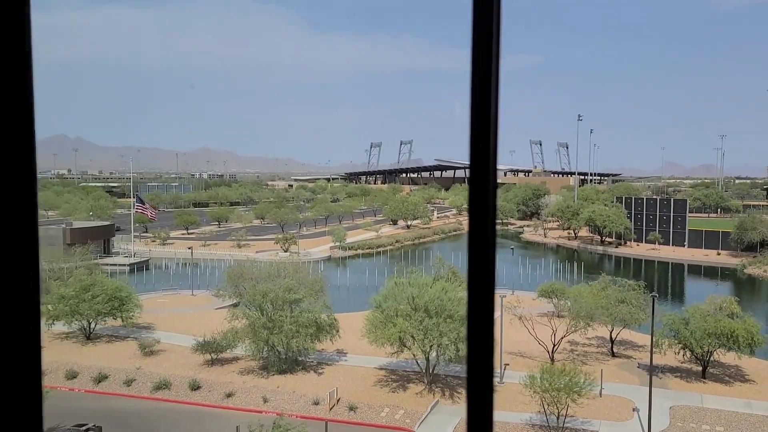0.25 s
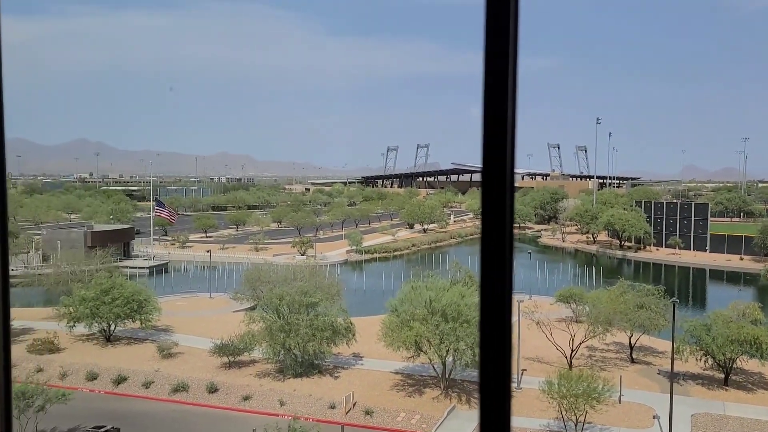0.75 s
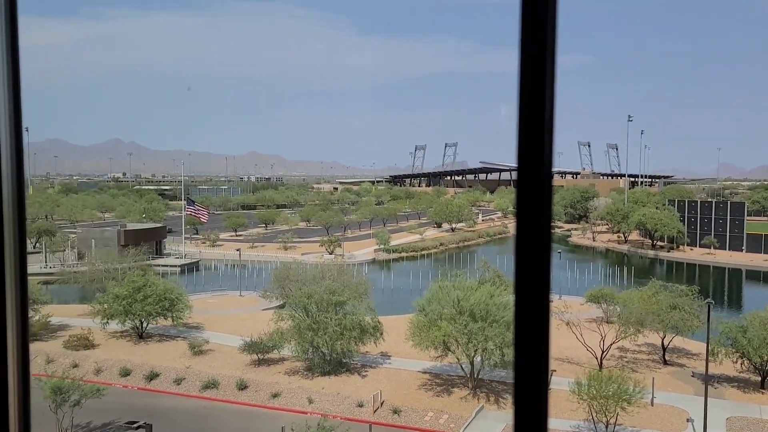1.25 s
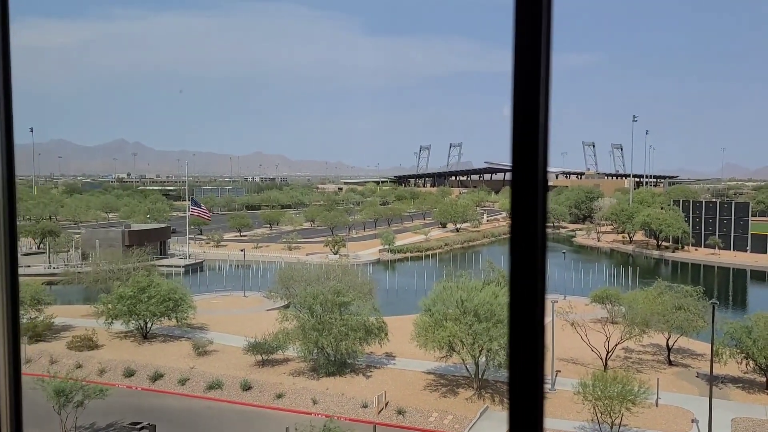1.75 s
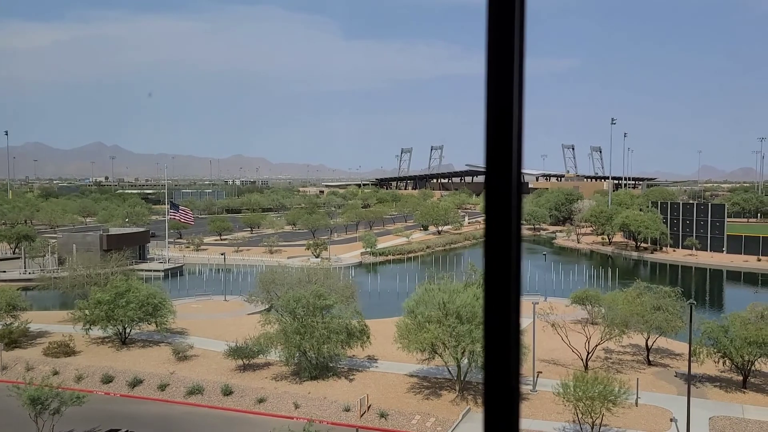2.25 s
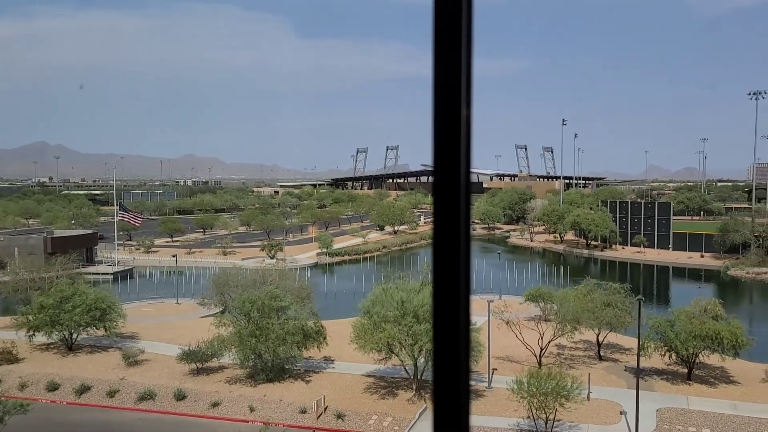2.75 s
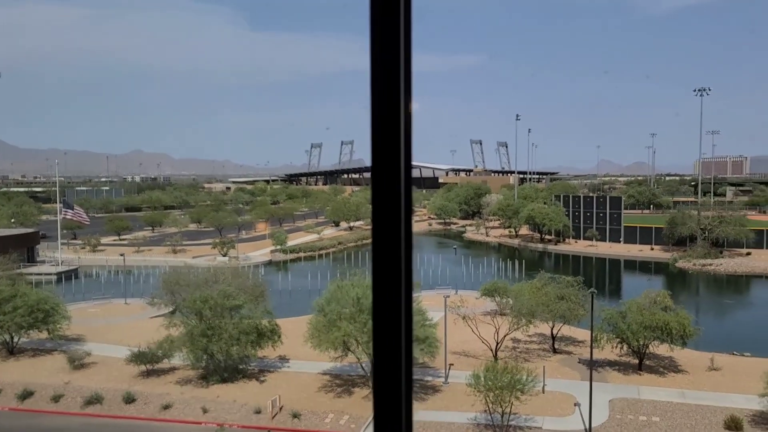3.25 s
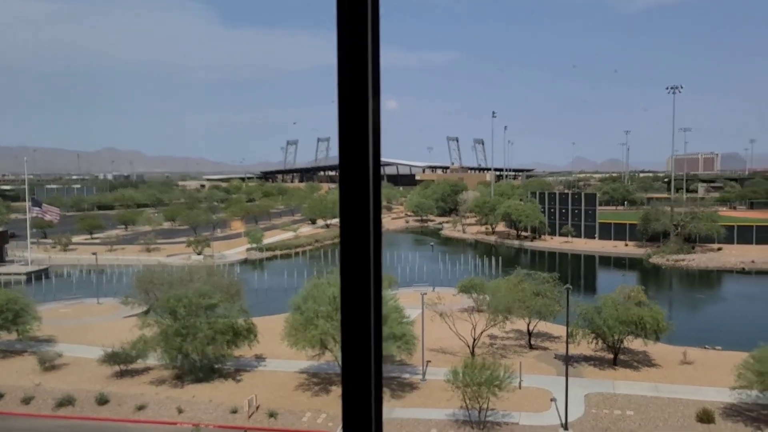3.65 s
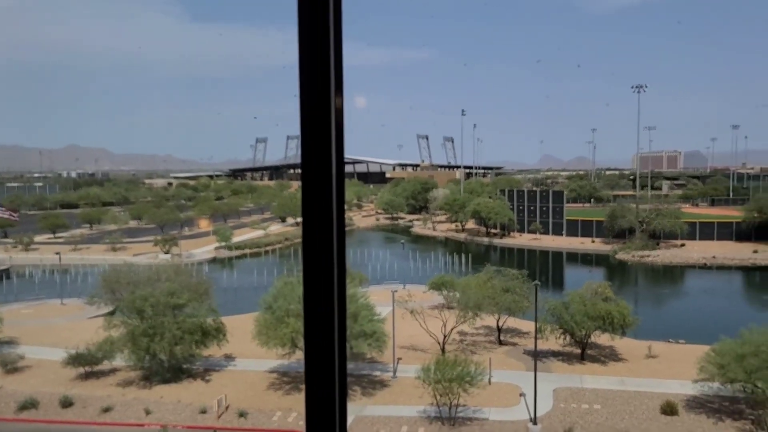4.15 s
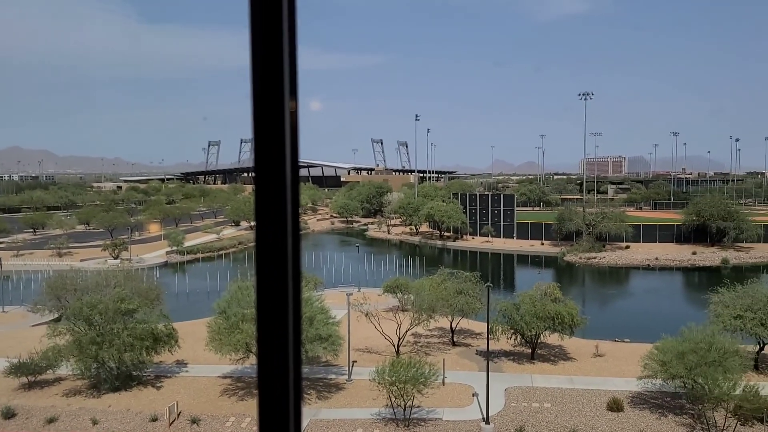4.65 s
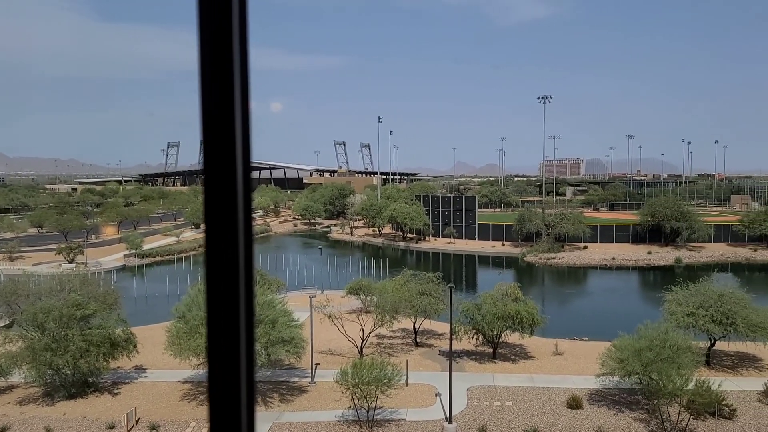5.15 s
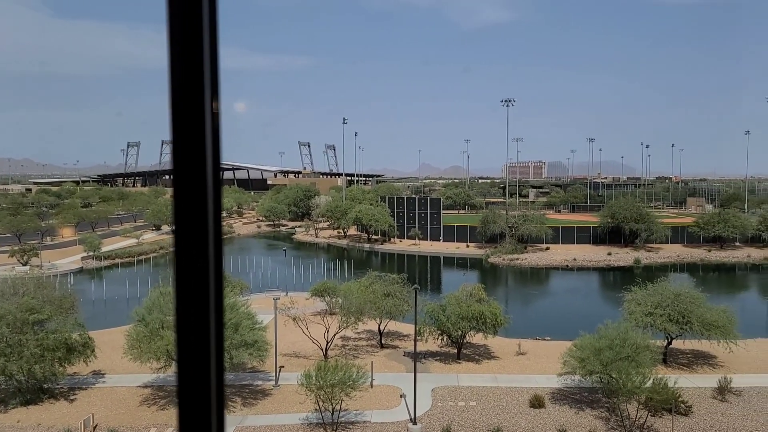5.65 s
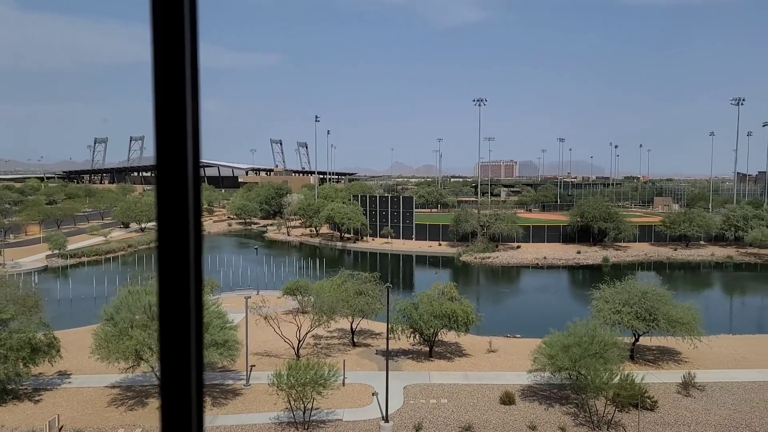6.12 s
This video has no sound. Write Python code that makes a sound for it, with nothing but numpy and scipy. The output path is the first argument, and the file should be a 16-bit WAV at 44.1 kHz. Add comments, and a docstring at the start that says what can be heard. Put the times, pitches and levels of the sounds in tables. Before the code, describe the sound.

A continuous low mechanical hum fills a small room, picked up by a hand-held stereo microphone turning at a window. Fan tones, mains hum and compressor drone blend into a fluttering throb over boomy cabinet rumble. Airy whoosh from the vanes, slightly stronger at the left, emerges early and grows gently. Around four seconds the drone dips, then becomes fuller. Nothing outdoors is heard.

```python
"""A room air conditioner runs steadily in a quiet hotel room, heard by a hand-held microphone turning at the window.
From the start two fans beat slowly, and the compressor's drone, a series of sines, throbs against the mains hum.
Shaped noise makes the cabinet's rumble, the grille's rush and a faint microphone hiss.
Over the first second the thrum, the whine, the booming room mode and the whoosh emerge from the window's edge.
The fans fall into step near two seconds; the drone thins near four and then swells, as the whoosh slowly grows."""
import sys
import numpy as np
from scipy import signal
from scipy.fft import rfft, irfft, next_fast_len
from scipy.io import wavfile
from scipy.ndimage import uniform_filter1d, map_coordinates

SR = 44100
rng = np.random.default_rng(int(sys.argv[2]) if len(sys.argv) > 2 else 0)


def log_audio(samples):
    """Write samples as a 16-bit WAV file to the path given in sys.argv[1]."""
    # one column per channel
    frames = np.atleast_2d(samples).T
    # limit to full scale, then quantise
    limited = np.clip(frames, -1, 1)
    pcm = np.round(limited * 32767).astype(np.int16)
    wavfile.write(sys.argv[1], SR, pcm)


N = 281563

# Harmonics of the fans. Each row: multiple of the rate, relative level in dB, left over right in dB,
# phase lead of the left ear in radians.
FAN_HARMONICS = [(1, -58.5, 1, -0.2), (3, -40.6, 1, 0.0), (4, -52.4, 0, 0.0), (6, -39.8, 0, -0.2),
                 (8, -57.9, -3, -0.1), (9, -61.8, 0, -0.0), (10, -65.6, -2, -0.1), (12, -52.9, -2, 0.1),
                 (15, -65.3, -3, -0.5)]
# Harmonics of the mains hum. Each row: multiple of the rate, level in dB, left over right in dB,
# phase lead of the left ear in radians.
MAINS_HARMONICS = [(1, -42.3, -1, 0.1), (2, -59.4, 3, -0.2), (3, -67.0, -2, -0.3)]
# Harmonics of the compressor. Each row: multiple of the rate, relative level in dB, left over right in dB,
# phase lead of the left ear in radians.
COMPRESSOR_HARMONICS = [(1, -42.0, 0, -0.2), (2, -38.1, 0, -0.0), (3, -60.3, 1, -0.3), (4, -48.0, 0, 0.1),
                        (5, -56.9, -2, -0.2), (8, -53.7, -1, 0.0), (9, -62.4, -6, -0.6),
                        (10, -63.3, 6, 0.5), (13, -51.1, -5, 0.6), (14, -54.4, 8, 1.2),
                        (15, -61.8, -1, -0.0), (16, -62.3, 0, -1.1), (17, -64.5, -4, 0.9),
                        (19, -65.4, 7, 1.3), (27, -79.0, 2, -0.8), (31, -85.0, -4, 0.1)]
# Standing waves swell and thin the drone as the microphone moves. Each row: time in seconds, gain in dB.
DRONE_SWELL = [(0.5, 0), (2.4, 0.7), (4.1, -2.3), (4.55, 2.1), (5.05, 2.5), (5.6, -0.2)]
# Likeness of the air noise at the two ears. Each row: frequency in Hz, left-right correlation.
EAR_LIKENESS = [(30, 0.94), (48, 0.98), (130, 0.99), (180, 0.87), (230, 0.95), (400, 0.77), (550, 0.7),
                (800, 0.52), (1000, 0.59), (1200, 0.0076), (1600, 0.092), (2500, 0), (16000, 0)]
# Spectrum of the cabinet rumble. Each row: frequency in Hz, density in dB per Hz before resonances.
RUMBLE_SPECTRUM = [(15, -91), (30, -72), (60, -65), (90, -62.5), (135, -64.5), (168, -69.5), (230, -70),
                   (420, -70), (520, -74), (620, -84.5), (900, -90), (2000, -120)]
# Resonances and nulls of cabinet and room. Each row: centre in Hz, width in Hz, lift in dB.
ROOM_RESONANCES = [(55, 10, -5), (95, 9.2, 4), (183, 5.2, -1.5), (192, 8.9, 2), (224.7, 26, 3.5),
                   (265.4, 27, -7.5), (326.5, 17.6, 6.5), (420, 18, 4), (565, 21, 6), (617, 39, -10)]
# Spectrum of the grille's rush. Each row: frequency in Hz, relative density in dB per Hz.
GRILLE_SPECTRUM = [(200, -31), (450, -7.5), (680, -1.5), (880, -4), (1100, -6), (1450, -8.5), (1900, -14.5),
                   (2400, -18.5), (3200, -20.5), (3900, -26), (4800, -29), (6000, -37), (8000, -39),
                   (16000, -51)]
# Spectrum of the microphone hiss. Each row: frequency in Hz, relative density in dB per Hz.
HISS_SPECTRUM = [(1000, -8), (6000, -4), (7400, -7.5), (8100, -5), (8550, 2), (9200, -1), (11200, -.5),
                 (12400, -2), (13500, 1), (15500, 1)]
# Course of the hiss. Each row: time in seconds, relative level in dB.
HISS_COURSE = [(0.1, -72), (0.13, -70), (4.83, -71), (6.3, -70)]
# Spectrum of the deepest room mode. Each row: frequency in Hz, relative density in dB per Hz.
BOOM_SPECTRUM = [(25, -50), (38, -23), (45.5, 2), (48, -2), (52, -6), (58, -32), (100, -100)]
# Spectrum of the whoosh through the vanes. Each row: frequency in Hz, relative density in dB per Hz.
WHOOSH_SPECTRUM = [(200, -80), (550, -33), (700, 2), (900, -2), (1030, 2.5), (1150, 0), (1380, -8.5),
                   (1600, -12), (2500, -37), (6000, -90)]
# Resonances and nulls of the vanes. Each row: centre in Hz, width in Hz, lift in dB.
VANE_RESONANCES = [(625, 45, -7), (680, 24, 1), (706, 29, -10), (888, 40, -4), (1006, 55, 1),
                   (1202, 30, -5), (1252, 44, 5), (1308, 30, -6), (1342, 44, 7.5)]

FAN_HZ, MAINS_HUM_HZ, COMPRESSOR_HZ = 24.523, 120.0, 57.178
FANS_GAIN_DB, COMPRESSOR_GAIN_DB = 0.27, -0.14
# The second fan's lag in speed when the two are in step, and the rate at which that lag changes
IN_STEP_S, SLIP_HZ, SLIP_HZ_PER_S = 1.99, 0.1363, -0.0093
# Strength of the second fan over the first, in the low and in the high tone
TWIN_LOW, TWIN_HIGH = 0.62, 0.25
# Time the microphone takes to come round the window's edge, and how each sound is shaded before
EMERGE_S = 1
BOOM_SHADE_DB, THRUM_SHADE_DB, WHINE_SHADE_DB, WHOOSH_SHADE_DB = -14, -7, -6, -4.5
GRILLE_DB, HISS_GAIN_DB = -48, 6.7
BOOM_OPEN_DB = -42  # once in the open
WHOOSH_DB, WHOOSH_DB_PER_S = -51.0, 0.29  # grows as the microphone turns toward the vanes
TOP_HZ = 15730


def amp(db):
    """Logarithmic level: decibels become a factor of amplitude."""
    return 10 ** (np.asarray(db) / 20)


def unit(x):
    """Normalisation: the signal is scaled to rms 1."""
    return x / np.sqrt(np.mean(x ** 2) + 1e-20)


def along(points, hz):
    """Spectral interpolation: straight lines join the points on a logarithmic frequency axis."""
    point_hz, value = np.transpose(points)
    return np.interp(np.log(hz + 1), np.log(point_hz + 1), value)


def bells(resonances, hz):
    """Resonance: each bell lifts or lowers a band, by half its decibels at half its width from the centre."""
    return sum(db * np.exp2(-(2 * (hz - centre) / width) ** 2) for centre, width, db in resonances)


def course(rows):
    """Slow variation: one value per sample, on straight lines between the timed rows."""
    seconds, value = np.transpose(rows)
    return np.interp(np.arange(N) / SR, seconds, value)


def wobble(rate):
    """Random fluctuation: a smooth curve through random knots, rate of them a second."""
    knots = rng.standard_normal(int(N * rate / SR) + 4)
    return map_coordinates(knots, [np.arange(N) * rate / SR])


def filtered(x, response):
    """Linear filtering: the spectrum is multiplied by a response of frequency."""
    m = next_fast_len(N + SR // 2)  # room for the filter's tail
    hz = np.fft.rfftfreq(m, 1 / SR)
    return irfft(rfft(x, m) * response(hz), m)[..., :N]


def panned(x, left_db):
    """Interaural level difference: the left ear is left_db louder than the right."""
    return x * amp(left_db * np.array([[.5], [-.5]]))


def shade():
    """Shading by an obstacle: 1 behind the window's edge, easing to 0 in the open."""
    emerged = np.clip(np.arange(N) / SR / EMERGE_S, 0, 1)
    return np.cos(np.pi / 2 * emerged ** 2) ** 2


def tones(rate_hz, harmonics, swell, drift, waver_db):
    """Harmonic series: sines on multiples of one unsteady rate; swell gives some a complex gain."""
    turns = rate_hz * np.arange(N) / SR + drift * wobble(1.53)
    out = np.zeros((2, N))
    for multiple, db, left_db, lead in harmonics:
        gain = swell.get(multiple, 1) * amp(db + waver_db * wobble(4))
        ear_lead = np.array([[lead], [0]])
        phase = 2 * np.pi * (multiple * turns + rng.random()) + np.angle(gain) + ear_lead
        out += panned(np.abs(gain) * np.sin(phase), left_db)
    return np.sqrt(2) * out  # levels are rms


def rush(density_db, lag_s=0):
    """Partial coherence: stereo noise of a given dB per Hz, alike in the bass, unlike in the treble.

    The right ear hears it lag_s late."""
    def colour(hz):
        turn = np.arccos(np.clip(along(EAR_LIKENESS, hz), -1, 1)) / 2
        return amp(density_db(hz)) * np.array([np.cos(turn), np.sin(turn)])

    white = rng.standard_normal((2, N)) * np.sqrt(SR / 2)  # power 1 per Hz
    mid, side = filtered(white, colour)
    right = filtered(mid - side, lambda hz: np.exp(-2j * np.pi * hz * lag_s))
    return np.array([mid + side, right])


def eddies(x, depth_db):
    """Turbulence: patches of random gain, some hundred Hz wide and a tenth of a second long; rms 1."""
    spectrum = signal.stft(x, nperseg=512)[2]
    field = rng.standard_normal(spectrum.shape[1:])
    field = uniform_filter1d(field, size=6, axis=0)  # over frequency
    field = uniform_filter1d(field, size=16, axis=1)  # over time
    patchy = spectrum * amp(depth_db * unit(field))
    return unit(signal.istft(patchy, nperseg=512)[1][:, :N])


def fans():
    """Beating: two fans slip in and out of step; their higher tone beats twice as fast as the lower."""
    t = np.arange(N) / SR - IN_STEP_S
    slip_turns = SLIP_HZ * t + SLIP_HZ_PER_S * t ** 2 / 2
    beats = {}
    for multiple, share in {3: TWIN_LOW, 6: TWIN_HIGH}.items():
        twin = share * np.exp(-2j * np.pi * multiple * slip_turns)
        beats[multiple] = (1 + twin) / np.hypot(1, share)
    return amp(FANS_GAIN_DB) * tones(FAN_HZ, FAN_HARMONICS, beats, drift=0.0057, waver_db=1.1)


def mains_hum():
    """Interference: the compressor's second harmonic slips behind this hum, a throb near six a second."""
    return tones(MAINS_HUM_HZ, MAINS_HARMONICS, {}, drift=0, waver_db=2.0)


def compressor():
    """Periodic machine sound: a low thrum, a drone an octave above and a whine high up the series."""
    thrum = amp(THRUM_SHADE_DB * shade())
    drone = amp(course(DRONE_SWELL))
    whine = amp(WHINE_SHADE_DB * shade())
    swell = {1: thrum, 2: drone, 13: whine, 14: whine}
    series = tones(COMPRESSOR_HZ, COMPRESSOR_HARMONICS, swell, drift=0.0012, waver_db=.5)
    return amp(COMPRESSOR_GAIN_DB) * series


def cabinet_rumble():
    """Resonant response: turbulence behind the fan excites the cabinet and the room."""
    noise = rush(lambda hz: along(RUMBLE_SPECTRUM, hz) + bells(ROOM_RESONANCES, hz))
    return amp(0.15 * wobble(3.9)) * noise


def grille_rush():
    """Flow noise: turbulent air leaves the grille as broadband noise."""
    return amp(GRILLE_DB) * eddies(rush(lambda hz: along(GRILLE_SPECTRUM, hz)), depth_db=1.25)


def microphone_hiss():
    """Self-noise: the microphone adds a faint, slightly wavering hiss."""
    hiss = eddies(rush(lambda hz: along(HISS_SPECTRUM, hz)), depth_db=1.2)
    level_db = HISS_GAIN_DB + course(HISS_COURSE) + .3 * wobble(12)
    return panned(amp(level_db) * hiss, left_db=-0.5)


def room_boom():
    """Modal excitation: turbulence sets the room's deepest mode booming, heard fully in the open."""
    boom = unit(rush(lambda hz: along(BOOM_SPECTRUM, hz)))
    return amp(BOOM_OPEN_DB + BOOM_SHADE_DB * shade() ** 3) * boom


def vane_whoosh():
    """Resonant flow noise: air whooshes through the vanes, louder and earlier at the left ear."""
    noise = rush(lambda hz: along(WHOOSH_SPECTRUM, hz) + bells(VANE_RESONANCES, hz), lag_s=0.00013)
    whoosh = eddies(noise, depth_db=0.65)
    level_db = WHOOSH_DB + WHOOSH_DB_PER_S * np.arange(N) / SR + WHOOSH_SHADE_DB * shade()
    return panned(amp(level_db) * whoosh, left_db=2.0)


def scene():
    """Superposition: machine tones, rumble, moving air and hiss add linearly."""
    machines = fans() + mains_hum() + compressor()
    low_noise = cabinet_rumble() + room_boom()
    high_noise = grille_rush() + microphone_hiss() + vane_whoosh()
    return machines + low_noise + high_noise


def record(dry):
    """Band limitation: nothing passes above TOP_HZ; the ends fade over 4 ms to avoid a click."""
    t = np.arange(N) / SR
    ends = np.clip(np.minimum(t, t[::-1]) / .004, 0, 1)
    faded = dry * np.sin(ends * np.pi / 2) ** 2
    return filtered(faded, lambda hz: hz < TOP_HZ)


dry = scene()
out = record(dry)
log_audio(out)
```